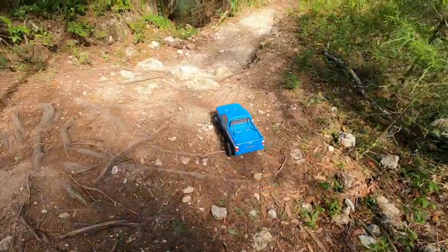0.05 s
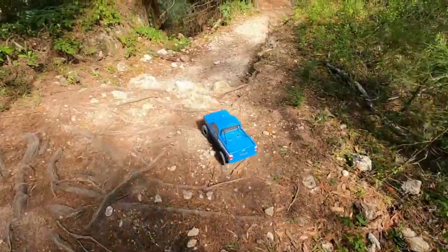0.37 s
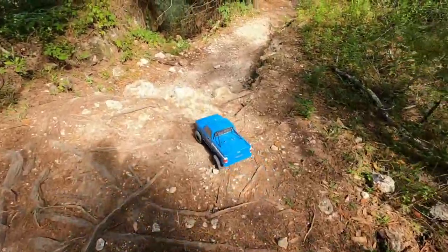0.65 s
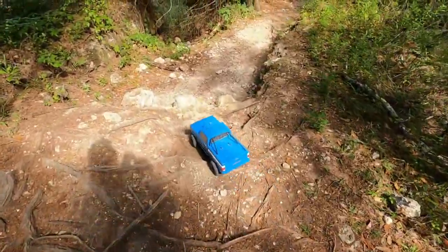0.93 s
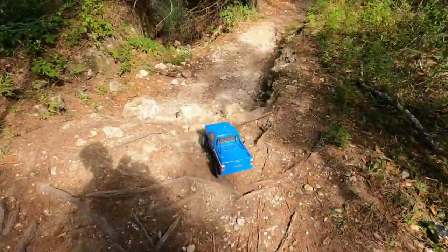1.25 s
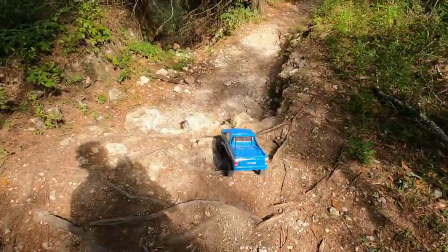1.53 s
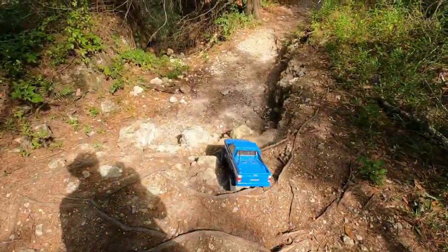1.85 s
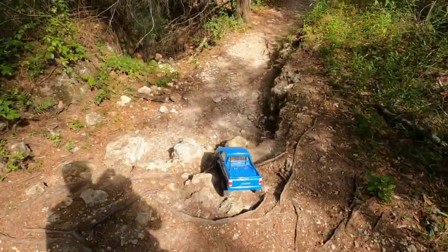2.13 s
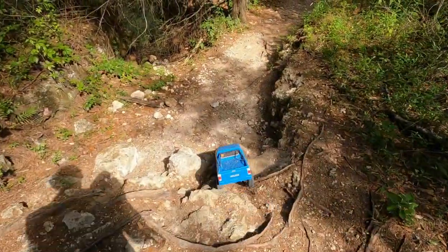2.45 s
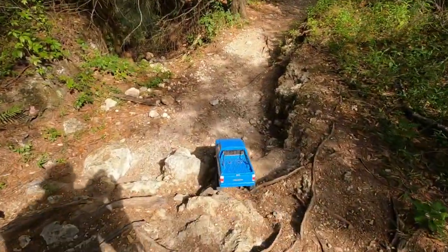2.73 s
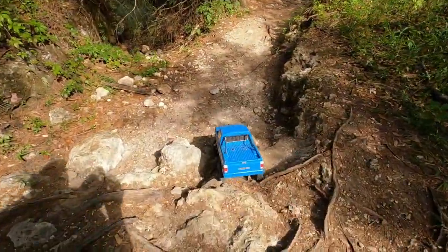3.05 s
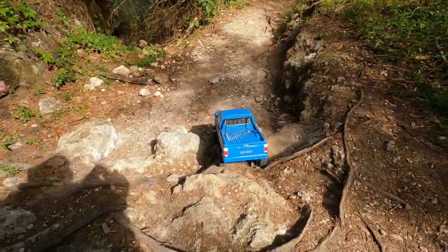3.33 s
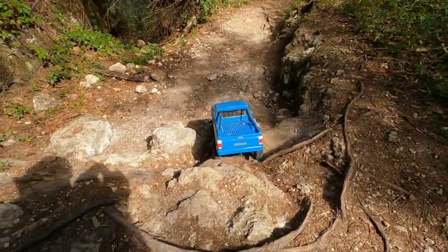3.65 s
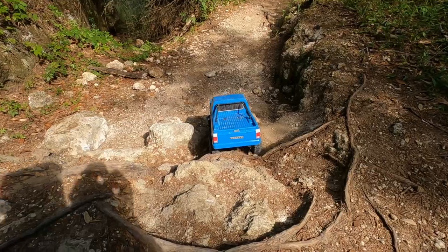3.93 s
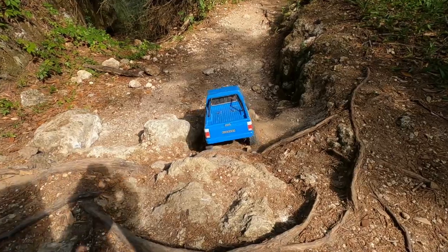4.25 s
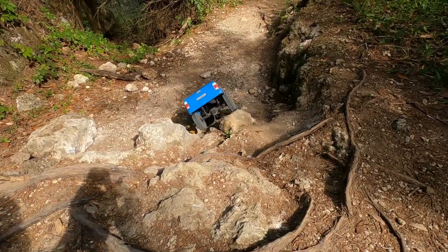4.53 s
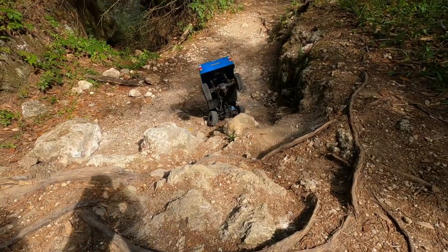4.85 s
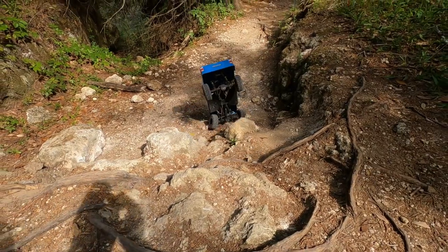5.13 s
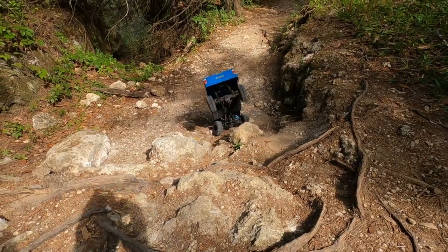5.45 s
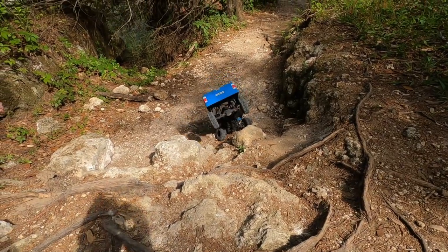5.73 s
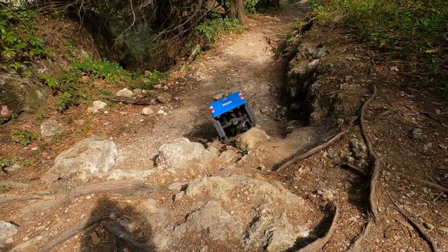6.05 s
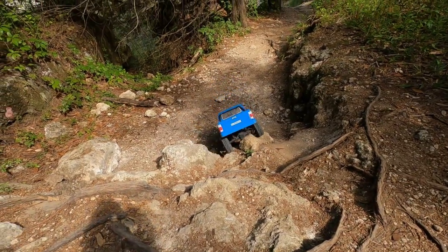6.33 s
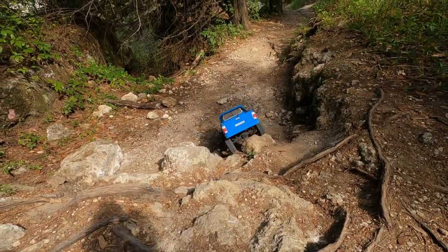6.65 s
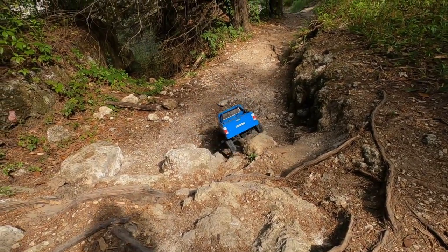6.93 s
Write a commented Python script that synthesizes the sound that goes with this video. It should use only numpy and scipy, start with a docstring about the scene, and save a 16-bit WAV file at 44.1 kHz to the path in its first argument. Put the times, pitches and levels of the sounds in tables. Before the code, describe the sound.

A handheld stereo microphone follows a little electric truck through quiet woods. A faint, wavering gear whine and gritty tyre noise come first, joined by heavy, uneven steps and clicking stones. After a brief low wind buffet and one dry twig snap, the truck slides and clatters down rock, its chassis and plastic shell rattling. A lull follows, then another knock and crunch as the whine returns. The background is a soft hush with a few tiny chirps.

```python
"""Model truck on a forest trail

A dry trail, on a stereo microphone in the hand of someone following a small electric model truck.
Close by, soles thud and crunch on dirt and litter, pebbles tick and one twig snaps. Just ahead the
tyres grind and slide over grit, the gears whine faintly, and chassis and shell rattle as the truck
knocks down a rock step. Behind lie the still wood and a few thin chirps; one puff of wind buffets
the microphone."""
import sys
import numpy as np
from scipy import signal
from scipy.fft import rfft, irfft, next_fast_len
from scipy.io import wavfile
from scipy.ndimage import uniform_filter1d

SR = 44100
rng = np.random.default_rng(int(sys.argv[2]) if len(sys.argv) > 2 else 0)


def wrap_up_sound(samples):
    """Save the sound to the file named by the first command line argument, as 16-bit audio."""
    columns = np.atleast_2d(samples).T
    # keep every value between -1 and 1, then stretch to whole-number steps
    tamed = np.clip(columns, -1, 1)
    steps = np.round(tamed * 32767).astype(np.int16)
    wavfile.write(sys.argv[1], SR, steps)


N = 307897
TIME = np.arange(N) / SR

# tyres sliding on sand: (start [s], length [s], sand level [dB], trickle level [dB])
TYRE_SLIDES = [(-0.6, 2.06, -67, -79), (1.75, 1.5, -72, -72.5), (3.047, 0.33, -66, -67.5),
               (3.527, 0.19, -62.5, -68.5), (3.811, 0.15, -72, -70), (3.899, 0.28, -63.5, -66.5),
               (4.034, 0.15, -63.5, -67), (4.217, 0.13, -56, -72), (4.314, 0.35, -58, -68),
               (4.472, 1.45, -70, -76)]


def from_db(db):
    """Decibels to gain."""
    return 10 ** (np.asarray(db) / 20)


def rms_one(x):
    """Scale to unit power."""
    return x / np.sqrt(np.mean(x ** 2) + 1e-20)


def peak_one(x):
    """Scale so that the loudest 4 ms have unit power."""
    return x / np.sqrt(uniform_filter1d(x ** 2, size=180, mode="constant").max())


def in_time(rows):
    """One curve for each column after a table's time column."""
    times, *columns = np.transpose(rows)
    return [np.interp(TIME, times, column) for column in columns]


def at_hz(points, hz):
    """Read a table on a log-frequency axis."""
    frequencies, levels = np.transpose(points)
    return np.interp(np.log(hz), np.log(frequencies), levels)


def phase_of(hz):
    """Running phase of a moving pitch, in radians."""
    return 2 * np.pi * np.cumsum(hz) / SR


def band(x, low_hz, high_hz, order=2):
    """Causal band-pass."""
    edges = [low_hz, min(high_hz, SR * 9 / 20)]
    return signal.sosfilt(signal.butter(order, edges, "band", fs=SR, output="sos"), x + 1e-18)


def resonance(x, hz, width_hz):
    """Two-pole resonance with unit gain at its peak."""
    radius = np.exp(-np.pi * width_hz / SR)
    feedback = [1, -2 * radius * np.cos(2 * np.pi * hz / SR), radius ** 2]
    return signal.lfilter(np.array([1, 0, -1]) * (1 - radius ** 2) / 2, feedback, x)


def dying(t, t60):
    """Exponential decay, 60 dB down after t60 seconds."""
    return np.exp(-np.log(1000) * t / t60)


def blow(t, rise_s, t60):
    """A quick rise and an exponential decay."""
    return (1 - np.exp(-t / rise_s)) * dying(t, t60)


def swell(start, length):
    """A smooth hump in time."""
    inside = (TIME >= start) & (TIME < start + length)
    return inside * np.sin(np.pi * (TIME - start) / length) ** 2


def flutter(per_s):
    """A random wander of spread about 1, with per_s new values a second."""
    knots = rng.standard_normal(8000)
    return np.interp(TIME * per_s, np.arange(len(knots)), knots)


def add(out, start, piece):
    """Mix a piece in at start seconds."""
    i = max(round(start * SR), 0)
    out[i:i + len(piece)] += piece[:max(N - i, 0)]


def grains(per_s, spread_db):
    """Random clicks, many small and few large; rms 1."""
    out, born = np.zeros(N), np.flatnonzero(rng.random(N) < per_s / SR)
    sizes = from_db(spread_db * np.minimum(rng.exponential(1, len(born)), 4))
    out[born] = sizes * rng.choice([-1, 1], len(born))
    return rms_one(out)


def contact(t, t60, strike):
    """One sharp impulse of height strike, then a dying rattle."""
    force = rng.standard_normal(len(t)) * dying(t, t60)
    force[0] = strike
    return force


def reflections(t60):
    """A dying cloud of small echoes, of unit energy."""
    cloud = rng.standard_normal(SR // 3) * dying(TIME[:SR // 3], t60)
    return cloud / np.linalg.norm(cloud)


def forest(level_db=-71):
    """The faint, even hush of the wood all around."""
    # spectrum of the hush: (frequency [Hz], relative level [dB])
    colour = [(12, -40), (20, -3), (88, -5.5), (177, -0.5), (285, -17), (388, -26), (759, -30),
              (1030, -16.5), (1910, -15), (2460, -26), (3400, -21.5), (4940, -17.5), (8180, -40),
              (16000, -44)]
    hz = np.maximum(np.fft.rfftfreq(2 * N, 1 / SR), 1)
    hush = irfft(rfft(rng.standard_normal(2 * N)) * from_db(at_hz(colour, hz)))[:N]
    return from_db(level_db) * rms_one(hush)


def chirps(echo_db=-5, echo_t60=0.22, waver=0.018):
    """Short high glides in the background, scattered by the trees."""
    # thin chirps and squeaks: (start [s], length [s], first pitch [Hz], last pitch [Hz], level [dB])
    glides = [(1.906, 0.024, 4100, 4460, -60), (1.954, 0.017, 10060, 9660, -66.5),
              (1.985, 0.017, 5640, 6060, -62), (2.329, 0.021, 5570, 5260, -59),
              (6.21, 0.019, 5760, 8300, -69)]
    out, unsteady = np.zeros(N), 1 + waver * flutter(500)
    for start, length, first_hz, last_hz, db in glides:
        hz = np.interp(TIME, [start, start + length], [first_hz, last_hz]) * unsteady
        out += from_db(db) * swell(start, length) * np.sin(phase_of(hz))
    return out + from_db(echo_db) * signal.fftconvolve(out, reflections(echo_t60))[:N]


def wind(start=3.63, length=0.18, left_db=-41, right_db=-55):
    """A puff buffets the microphone, mostly its left port."""
    puff = band(rng.standard_normal((2, N)), 18, 62, order=3) * swell(start, length)
    peak_power = uniform_filter1d(puff ** 2, size=3000).max(axis=1, keepdims=True)
    return from_db([[left_db], [right_db]]) * puff / np.sqrt(peak_power)


def ground(colour, per_s, spread_db, crack_db, cracks_per_s, patchy_db=3.5):
    """Crushed ground as three voices of rms 1, low to high: packed soil, grit and fine sand."""
    # hollow ring of the packed earth: (frequency [Hz], width [Hz], gain [dB])
    earth_modes = [(183, 24.5, 3.5), (296, 39, -5), (1110, 21, -17)]
    edges_hz = 112 * 2 ** np.arange(0, 7.1, .5)
    cracks = from_db(crack_db) * grains(cracks_per_s, spread_db=4.0)
    voices = np.zeros((3, N))
    for k, (low, high) in enumerate(zip(edges_hz, edges_hz[1:])):
        hz = np.sqrt(low * high)
        voice = int(hz > 450) + int(hz > 2600)
        # small grains clump in one band each; larger cracks reach all grit and sand bands at once
        clumps = grains(per_s, spread_db) * from_db(patchy_db * flutter(75))
        drive = clumps + cracks * (voice > 0) * (-1) ** k
        voices[voice] += from_db(at_hz(colour, hz)) * band(drive, low, high)
    ring = sum(from_db(db) * resonance(voices, hz, width) for hz, width, db in earth_modes)
    return np.array([rms_one(v) for v in voices + ring])


def deep_earth(low_hz=62, high_hz=175, lumpy_db=2.0):
    """The deep, lumpy voice of the ground; rms 1."""
    return rms_one(from_db(lumpy_db * flutter(14)) * band(rng.standard_normal(N), low_hz, high_hz))


def footsteps(level_db=2.5, soil_boost_db=1.5, crunch_rise_s=0.0043, soil_rise_s=0.0081, linger=1.325):
    """A sole crushes grit and sand at once; the soil takes the weight later and sounds longer."""
    # soles and tyres landing and scuffing:
    # (time [s], relative crunch level [dB], soil offset [dB], sand offset [dB], crunch t60 [s])
    landings = [(0.141, -53, 7, 1, 0.1), (0.186, -59, 14, -2, 0.14), (0.326, -55.5, 3.5, -6, 0.25),
                (0.404, -52, 1.5, -6.5, 0.16), (0.477, -50.5, -6, -5, 0.1), (0.757, -53, -2, -2.5, 0.1),
                (1.014, -52.5, -12, -7, 0.12), (1.302, -52, 2, -8, 0.19), (1.351, -50, -5, -14, 0.11),
                (1.361, -35.5, 1, -6, 0.24), (1.409, -42, -2, -7, 0.31), (1.592, -41, 0.5, -7, 0.28),
                (1.634, -41.5, -1.5, -11, 0.22), (1.701, -43.5, -2, -9.5, .24), (1.859, -52, 4, -2, 0.1),
                (1.985, -50, -1.5, -4.5, 0.13), (2.112, -53, -3, -9, 0.13), (2.141, -54, -9, -7, 0.13),
                (2.28, -51, 1.5, -14, 0.31), (2.31, -40, -6, -5.5, 0.089), (2.395, -53.5, -6, -12, 0.13),
                (2.518, -48.5, -1, -5.5, 0.24), (2.558, -49.5, -1, -19, 0.31), (2.578, -47, -2.5, -6, 0.3),
                (2.691, -39, -2.5, -6, 0.21), (2.721, -39, -5, -9.5, 0.36), (3.123, -57, -1, -9, 0.34),
                (3.219, -60, 5, -14, 0.12), (3.29, -62, 0, -13, 0.064), (3.363, -49, 0, -7, 0.093),
                (3.569, -59.5, 1, -13, .55), (3.64, -62.5, 5, -7, .3), (4.173, -50.5, -2, -2, 0.095),
                (4.509, -47.5, -7, -3.5, 0.3), (4.548, -44.5, -18, -10, 0.13),
                (4.627, -42.5, -1.5, -5, 0.22), (4.749, -57.5, 2.5, -3.5, 0.27), (4.83, -63, 6, 0.5, 0.22),
                (4.925, -65, 6, 3, 0.17), (5.425, -55, 5.5, -9, 0.045), (6.41, -40, -3, -1.5, 0.16),
                (6.451, -48.5, 0.5, -7, 0.28)]
    # tone of the ground underfoot: (frequency [Hz], band weight [dB])
    colour = [(29, -52), (50, -33), (150, -12), (240, 2), (285, -5.5), (428, 0), (495, -2), (600, -10),
              (860, -8), (1120, -5), (1400, -12.5), (2620, -13.5), (4450, -24), (8540, -47.5), (12600, -56),
              (16000, -76)]
    power, t = np.zeros((3, N)), TIME[:SR // 2]
    for start, db, soil_db, sand_db, t60 in landings:
        grit = from_db(db) * blow(t, crunch_rise_s, t60)
        soil = from_db(db + soil_db + soil_boost_db) * blow(t, soil_rise_s, t60 * linger)
        for voice, envelope in zip(power, (soil, grit, from_db(sand_db) * grit)):
            add(voice, start, envelope ** 2)
    crushed = ground(colour, per_s=4000, spread_db=3.0, crack_db=-8.5, cracks_per_s=360)
    return from_db(level_db) * np.sum(np.sqrt(power) * crushed, axis=0)


def thuds(rise_s=0.014):
    """A heavy landing shakes the earth below."""
    # heavy landings: (time [s], relative level [dB], t60 [s])
    landings = [(1.36, -52, .23), (1.59, -50, 0.22), (2.565, -50, 0.22), (2.695, -41, .2), (3.36, -43, .08),
                (4.17, -50, .09), (4.52, -42.5, 0.26), (4.625, -42, .23), (4.745, -50, 0.23),
                (6.45, -42, .2)]
    weight, t = np.zeros(N), TIME[:SR // 2]
    for start, db, t60 in landings:
        add(weight, start, from_db(db) * blow(t, rise_s, t60))
    return weight * deep_earth()


def booms(rise_s=0.0019, sag_per_s=.15, rough=.2, rough_per_s=70):
    """A heavy landing sets a hollow note ringing; its pitch sags as the load eases."""
    # low hollow notes after heavy landings: (time [s], first pitch [Hz], relative level [dB], t60 [s])
    notes = [(1.374, 345, -32, 0.11), (1.408, 283.5, -29, 0.14), (1.47, 281.5, -42.5, 0.42),
             (1.607, 300, -42, .1), (1.641, 350, -39, .1), (1.708, 315, -37, .09), (2.718, 275, -35, 0.13),
             (3.225, 262, -53.5, .13)]
    out, t = np.zeros(N), TIME[:SR // 2]
    for start, hz, db, t60 in notes:
        note = np.sin(2 * np.pi * hz * t * (1 - sag_per_s * t / 2))
        add(out, start, from_db(db) * blow(t, rise_s, t60) * note)
    return out * (1 + rough * flutter(rough_per_s))


def thump(start=1.179, length=0.037, top_hz=222, end_hz=152, level_db=-27):
    """A soft hollow bump whose pitch sags."""
    hz = np.interp(TIME, [start, start + length], [top_hz, end_hz])
    return from_db(level_db) * swell(start, length) * np.sin(phase_of(hz))


def pebbles(level_db=-4.0, ring_db=1, ring_width_hz=200, half_span_octaves=0.3):
    """Each tick is one sharp contact and a brief rattle that ring at the pitch of the stone."""
    # pebbles knocked and litter cracking: (time [s], relative peak [dB], pitch [Hz], t60 [s])
    ticks = [(0.149, -41.5, 1640, 0.04), (0.329, -50, 1900, 0.034), (0.69, -47, 1400, .016),
             (0.766, -52, 2200, .02), (1.017, -49, 1900, .025), (1.076, -49, 1190, .03),
             (1.134, -52, 3800, .025), (1.18, -48.5, 2600, .04), (1.367, -34, 2300, 0.061),
             (1.376, -33, 1290, 0.036), (1.385, -43, 2580, 0.028), (1.412, -44, 2700, 0.027),
             (1.478, -33.5, 1700, 0.022), (1.479, -39, 2750, 0.014), (1.497, -42.5, 3240, .013),
             (1.594, -37, 2250, 0.051), (1.607, -46, 3900, .025), (1.638, -48.5, 3000, .018),
             (1.704, -42, 1800, .045), (1.861, -46, 2400, 0.05), (1.992, -49.5, 3150, .04),
             (2.312, -41.5, 2200, 0.04), (2.651, -46.5, 3280, .04), (2.402, -51, 2700, 0.044),
             (2.727, -39, 1950, .04), (2.54, -31, 2600, 0.012), (2.799, -35.5, 3740, 0.017),
             (2.818, -39, 2400, 0.028), (2.851, -42.5, 955, 0.025), (3.367, -46.5, 620, .035),
             (3.135, -56, 2900, .03), (3.165, -54, 2900, .03), (3.572, -43.5, 1750, 0.08),
             (3.612, -39.5, 1730, 0.043), (3.713, -51.5, 2010, 0.049), (3.755, -52.5, 1480, .06),
             (4.062, -58, 4970, .03), (4.175, -38.5, 1310, 0.018), (4.25, -44.5, 3570, 0.083),
             (4.289, -39, 2750, 0.02), (4.37, -46, 1700, .04), (4.403, -41.5, 2900, 0.04),
             (4.458, -49, 3400, 0.022), (4.518, -47, 2980, .04), (4.563, -48, 3080, 0.033),
             (5.11, -59.5, 4200, 0.012), (5.136, -54, 1830, 0.05), (5.426, -44.5, 1600, 0.014),
             (5.545, -60, 6000, 0.051), (5.666, -57.5, 2090, 0.026), (5.767, -55, 3330, 0.013),
             (6.112, -60, 4250, 0.027), (6.311, -54, 3500, .025), (6.413, -38.5, 3000, 0.036),
             (6.537, -54, 2550, .05)]
    out, t, span = np.zeros(N), TIME[:SR // 10], 2 ** half_span_octaves
    for start, db, hz, t60 in ticks:
        force = contact(t, t60, strike=5.4)
        click = band(force, hz / span, hz * span, order=1)
        ring = from_db(ring_db) * resonance(force, hz, ring_width_hz)
        tick = band(click + ring, hz / 4, min(hz * 2.8, 7000))
        add(out, start, from_db(db + level_db) * peak_one(tick))
    return out


def hard_ring(t, hz, t60):
    """The few uneven modes of a struck hard body; the higher ones die sooner."""
    # modes of the body: (frequency [multiple of the lowest], gain [dB])
    modes = [(1, 2), (1.48, -16), (2.52, -12)]
    return sum(from_db(db) * np.sin(2 * np.pi * hz * ratio * t) * dying(t, t60 / ratio)
               for ratio, db in modes)


def gravel(stones_per_s=110, low_hz=900, high_hz=4200, ring_cycles=26, fade_db=7, level_db=3):
    """Loose stones clack together after a landing, each at its own pitch, ever more weakly."""
    # gravel kicked about by the heaviest landings: (start [s], length [s], relative level [dB])
    sprays = [(1.366, .11, -42), (1.595, .1, -40), (1.7, .07, -53), (2.555, .07, -47), (2.689, 0.15, -46),
              (4.361, .13, -52), (4.508, 0.083, -48), (4.628, 0.056, -49), (6.409, 0.087, -48)]
    out, t = np.zeros(N), TIME[:SR // 16]
    for start, length, db in sprays:
        for k, (late, pitch, softness) in enumerate(rng.random((24, 3))):
            delay = (k + late) / stones_per_s
            if delay < length:
                hz = low_hz * (high_hz / low_hz) ** pitch
                gain = from_db(db + level_db + 1.5 - 2 * softness - fade_db * delay / length)
                add(out, start + delay, gain * hard_ring(t, hz, ring_cycles / hz))
    return band(out, 450, 7000)


def clinks(rise_s=0.0018, rough=.25, rough_per_s=150):
    """Short, unsteady clinks and rings from stones and the truck's shell."""
    # clinks and rings: (time [s], pitch [Hz], relative level [dB], t60 [s])
    rings = [(0.148, 2400, -40, 0.04), (0.149, 3280, -40, 0.036), (1.371, 1034, -39, 0.14),
             (1.48, 1706, -53, 0.15), (1.606, 1290, -41, 0.086), (1.65, 1173, -43.5, 0.16),
             (2.578, 886, -43, 0.11), (2.737, 1110, -35, .14), (3.611, 1930, -45, .06),
             (4.473, 890, -44.5, 0.17), (4.557, 1806, -41, .06)]
    out, t = np.zeros(N), TIME[:SR // 4]
    for start, hz, db, t60 in rings:
        add(out, start, from_db(db) * (1 - np.exp(-t / rise_s)) * hard_ring(t, hz, t60))
    return out * (1 + rough * flutter(rough_per_s))


def twig(start=4.299, left_db=0, right_db=-2):
    """One dry snap, almost straight ahead, rings the twig's short modes."""
    # twig modes: (frequency [Hz], relative level [dB], t60 [s])
    modes = [(1540, -21, 0.0117), (1770, -18.5, 0.011), (2800, -24, 0.0092), (3480, -18.5, 0.0067),
             (4610, -16, 0.0058), (5630, -22.5, 0.0087), (8600, -36.5, 0.012), (10100, -32.5, 0.0092)]
    out, t = np.zeros(N), TIME[:SR // 20]
    snap = sum(from_db(db) * np.sin(2 * np.pi * hz * t) * dying(t, t60) for hz, db, t60 in modes)
    add(out, start, snap)
    return from_db([[left_db], [right_db]]) * band(out, 1400, 9900, order=4)


def trickle(grains_per_s=2200, low_hz=3720, high_hz=7550, clumps_db=3.5, clumps_per_s=130):
    """The finest grains run off each slide in bright, crackling clumps."""
    flow = sum(from_db(db) * swell(start, length) for start, length, _, db in TYRE_SLIDES)
    falling = grains(grains_per_s, spread_db=4.5) * from_db(clumps_db * flutter(clumps_per_s))
    return flow * rms_one(band(falling, low_hz, high_hz))


def rolling(steady_db=-56, uneven_db=1.34, bumps_per_s=35, catch_db=1.5, catches_per_s=120):
    """Tyres grind soil, grit, sand and the deep earth; sandy slides swell, catch and fade on top."""
    # how hard tyres and shuffling feet grind the loose ground: (time [s], grit level [dB])
    grinding = [(0, -62.5), (1.25, -59.5), (1.48, -59), (1.55, -62.5), (1.76, -55.5), (1.9, -62),
                (2.06, -63.5), (2.24, -61.5), (2.5, -56), (2.82, -57), (2.87, -72), (2.93, -64.5),
                (2.99, -74.5), (3.09, -74), (3.15, -65.5), (3.26, -62), (3.42, -73), (3.5, -76.5),
                (3.62, -66), (3.76, -65), (3.84, -78), (3.93, -66), (4.1, -64.5), (4.24, -58.5),
                (4.325, -57), (4.38, -51.5), (4.56, -53.5), (4.78, -58.5), (4.88, -63.5), (5.02, -68),
                (5.15, -80.5), (5.85, -83.5), (6.38, -75.5), (6.5, -66), (6.84, -69), (6.98, -53.5)]
    # tone of the ground under the tyres: (frequency [Hz], band weight [dB])
    colour = [(29, -44), (50, -8.5), (125, -15), (189, -5.5), (398, -0.5), (450, -1.5), (630, -7.5),
              (802, -8), (1100, -6.5), (1660, -7), (1820, -8), (2880, -12.5), (8750, -32), (12000, -46.5),
              (16000, -61)]
    effort_db = in_time(grinding)[0] - steady_db + uneven_db * flutter(bumps_per_s)
    grit = from_db(steady_db + effort_db)
    soil = from_db(steady_db - 0.35 + 0.89 * effort_db)
    sand = from_db(steady_db - 6 + 0.96 * effort_db)
    deep = from_db(steady_db - 14.5 + 0.66 * effort_db)
    slide = sum(from_db(db) * swell(start, length) for start, length, db, _ in TYRE_SLIDES)
    slide *= from_db(catch_db * flutter(catches_per_s))
    gains = np.hypot([soil, grit, sand], [from_db(-16) * slide, from_db(-1.5) * slide, slide])
    crushed = ground(colour, per_s=2500, spread_db=2.0, crack_db=-7.5, cracks_per_s=300)
    return np.sum(gains * crushed, axis=0) + deep * deep_earth()


def hum(start=5.87, fade_s=0.14, hz=320, width_hz=80, level_db=-69):
    """A low unsteady hum while the truck tips back onto its wheels."""
    drone = resonance(resonance(rng.standard_normal(N), hz, width_hz), hz, width_hz)
    fade_in = np.clip((TIME - start) / fade_s, 0, 1)
    return from_db(level_db) * fade_in * rms_one(drone)


def speed_controller(switching_hz=8017, ripple_hz=71.6, judder_db=3.5):
    """The controller switches with a thin tone that ripples when the motor turns."""
    # how hard the controller is driven: (time [s], tone level [dB], ripple depth [rad])
    drive = [(0, -87, 1), (2.7, -91, .8), (2.95, -87, .3), (3.45, -84, .2), (3.7, -89, .5), (4.25, -87, .5),
             (4.4, -110, 0), (5.68, -110, 0), (5.75, -91, 0), (6.1, -94, 0.09), (6.28, -90, .1),
             (6.36, -86, 1), (6.52, -88, 0.11), (6.7, -84, 1.25), (6.85, -87, 1.1), (6.98, -91, .8)]
    level_db, depth = in_time(drive)
    ripple = np.sin(phase_of(ripple_hz * (1 + .15 * flutter(11))))
    tone = np.sin(2 * np.pi * switching_hz * TIME + depth * ripple)
    return from_db(level_db + judder_db * flutter(15)) * tone


def gears(wobble=0.0151, wobbles_per_s=130, judder_db=3.0, rasp=0.7, rasp_per_s=220, upper_db=-17):
    """The motor's gears whine, wobble and rasp, and grow overtones when the teeth bite."""
    # gear whine: (time [s], nominal tooth rate [Hz], level [dB])
    motor = [(0, 1850, -62), (.07, 1808, -64), (.13, 1790, -62), (.19, 1945, -66), (.26, 1934, -62.5),
             (.33, 1965, -69), (.39, 1856, -71), (.46, 1765, -69), (.505, 1676, -63), (.55, 1606, -59.5),
             (.6, 1690, -69), (.7, 1700, -72), (.755, 1700, -59), (.8, 1587, -66), (.85, 1520, -65),
             (.89, 1506, -58), (.97, 1495, -69), (1.12, 1466, -65.5), (1.26, 1410, -65), (1.33, 1474, -65),
             (1.9, 1410, -85), (6.45, 1670, -97), (6.6, 1640, -65), (6.66, 1593, -76), (6.72, 1616, -66),
             (6.77, 1570, -72), (6.82, 1556, -64), (6.86, 1474, -74), (6.98, 1600, -64)]
    # teeth biting under load: (start [s], length [s], level [dB])
    bites = [(.01, 0.082, -66), (0.2, 0.051, -58), (.255, 0.044, -63.5), (0.322, .06, -63),
             (0.586, .05, -66)]
    # overtones of a bite, two to five times the tooth rate: (gain [dB])
    overtones_db = [2, -9, -19, -21]
    hz, level_db = in_time(motor)
    mesh_phase = phase_of(hz * (1 + wobble * flutter(wobbles_per_s)))

    def partial(ratio):
        """A tone at ratio times the tooth rate, rough in level and phase."""
        tone = np.sin(ratio * mesh_phase) * (1 + rasp * flutter(rasp_per_s))
        return tone + np.cos(ratio * mesh_phase) * rasp * flutter(rasp_per_s)

    gain = from_db(level_db + judder_db * flutter(40))
    whine = gain * (partial(0.97) + from_db(upper_db) * partial(2.2))
    bite = sum(from_db(db) * swell(start, length) for start, length, db in bites)
    return whine + bite * sum(from_db(db) * partial(k) for k, db in enumerate(overtones_db, 2))


def clack(start=4.917, level_db=-45.0, rattle_t60=0.052):
    """A hard part snaps against stone as the truck comes to stand on its nose."""
    # modes of the hard part: (frequency [Hz], width [Hz], gain [dB])
    modes = [(2560, 140, 1), (2810, 140, 1), (4240, 1000, -12), (5600, 300, -21), (8450, 300, -16)]
    out = np.zeros(N)
    force = contact(TIME[:SR // 8], rattle_t60, strike=7.4)
    ring = sum(from_db(db) * resonance(force, hz, width) for hz, width, db in modes)
    add(out, start, peak_one(ring))
    return from_db(level_db) * band(out, 1600, 12000)


def knocks():
    """The truck hits rock: one contact, then loose parts rattle in the chassis and plastic shell."""
    # hits on rock: (time [s], chassis peak [dB], shell peak [dB], rattle t60 [s])
    hits = [(2.56, -51, -43, 0.11), (2.585, -42.5, -42.5, 0.19), (2.69, -37, -40.5, .05),
            (2.723, -36.5, -50, .08), (2.895, -52, -57.5, 0.22), (4.175, -45, -56, 0.043),
            (4.208, -64, -60, .2), (4.225, -54.5, -50.5, 0.46), (4.512, -42, -55, 0.28),
            (4.552, -42, -53, 0.37), (4.631, -34.5, -44.5, 0.15), (4.655, -38.5, -44.5, 0.1),
            (4.755, -49.5, -57, 0.21), (6.413, -50, -42.5, 0.17), (6.455, -47.5, -45.5, 0.28),
            (6.581, -50.5, -55, 0.094), (6.792, -55.5, -51.5, 0.067), (6.874, -53, -44, 0.085),
            (6.928, -45.5, -36.5, 0.047), (6.95, -51, -46.5, 0.23)]
    # modes of the chassis and of the shell: (frequency [Hz], width [Hz], gain [dB])
    chassis_modes = [(180, 43, 0), (477, 106, -1), (706, 50, -1.5)]
    shell_modes = [(902, 89, 1.5), (1314, 110, -8), (1560, 170, -8.5), (2580, 55, -17)]
    out, t = np.zeros(N), TIME[:SR // 3]
    for start, chassis_db, shell_db, t60 in hits:
        force = contact(t, t60, strike=13)
        for modes, db in ((chassis_modes, chassis_db), (shell_modes, shell_db)):
            body = sum((-1) ** k * from_db(gain_db) * resonance(force, hz, width)
                       for k, (hz, width, gain_db) in enumerate(modes))
            add(out, start, from_db(db) * peak_one(band(body, 105, 4000)))
    return out


def microphone(x, echo_db=-9, near_t60=0.017, far_t60=0.07, grain_db=-4, left_lead_s=1.2e-5):
    """Two ports: the left hears a little early, echoes differ and grains come from changing sides."""
    # how much the sound differs between the ports: (frequency [Hz], side gain [dB])
    spread = [(60, -13.5), (170, -13.5), (350, -11.5), (700, -11), (1400, -2.5), (2800, -5), (5500, -0.5),
              (10000, 2.5)]
    size = next_fast_len(N + SR // 3)
    hz = np.maximum(np.fft.rfftfreq(size, 1 / SR), 1)
    mid = rfft(x, size)
    echoes = mid * rfft(from_db(echo_db) * (reflections(near_t60) + reflections(far_t60)), size)
    shifting = from_db(grain_db) * rfft(x * flutter(480), size)
    side = from_db(at_hz(spread, hz)) * (echoes + shifting)
    lead = np.exp(1j * np.pi * hz * left_lead_s)
    return irfft(np.array([(mid + side) * lead, (mid - side) / lead]), size)[:, :N]


def scene():
    """Everything on the trail, heard from the walker's hand."""
    treading = footsteps() + thuds() + booms() + thump() + rolling() + trickle()
    clatter = pebbles() + gravel() + clinks()
    truck = knocks() + clack() + gears() + speed_controller() + hum()
    return microphone(treading + clatter + truck + chirps() + forest()) + twig() + wind()


def record(dry, threshold_db=-19, release_db_per_s=130, attack_s=0.0012, cutoff_hz=15900):
    """The recorder's gain control ducks briefly after a very loud peak; the top is cut steeply."""
    over_db = np.maximum(20 * np.log10(np.abs(dry).max(axis=0) + 1e-9) - threshold_db, 0)
    held_db = np.maximum.accumulate(over_db + release_db_per_s * TIME) - release_db_per_s * TIME
    pole = np.exp(-1 / (attack_s * SR))
    ducked = dry * from_db(-signal.lfilter([1 - pole], [1, -pole], held_db))
    return signal.sosfilt(signal.ellip(10, .1, 80, cutoff_hz, fs=SR, output="sos"), ducked)


dry = scene()
out = record(dry)
wrap_up_sound(out)
```